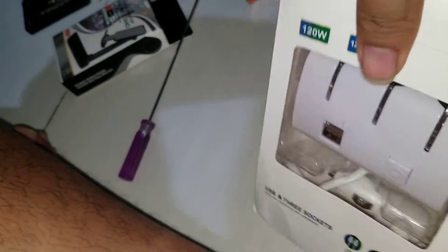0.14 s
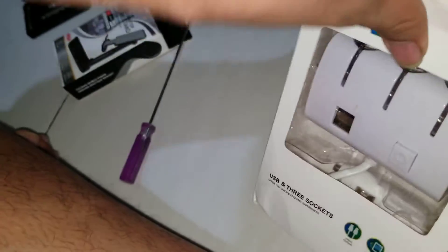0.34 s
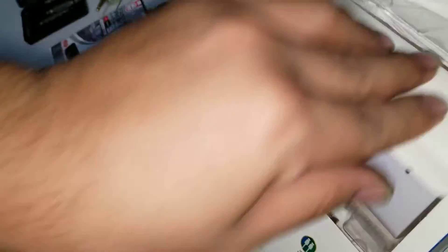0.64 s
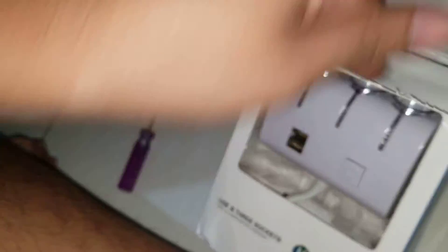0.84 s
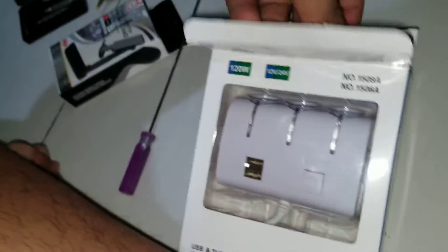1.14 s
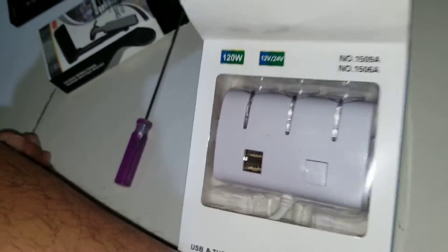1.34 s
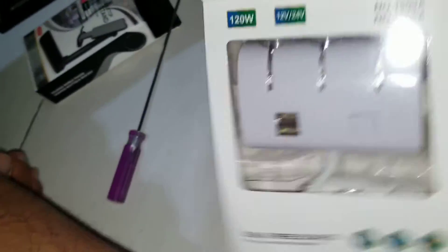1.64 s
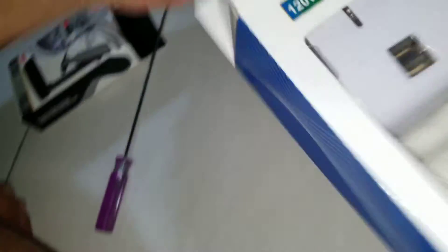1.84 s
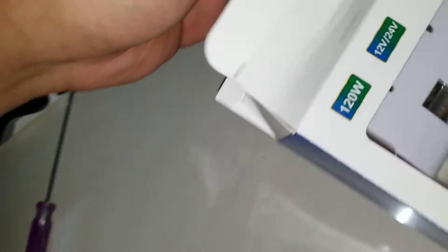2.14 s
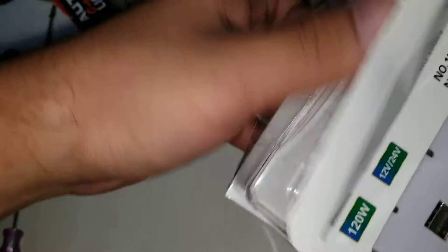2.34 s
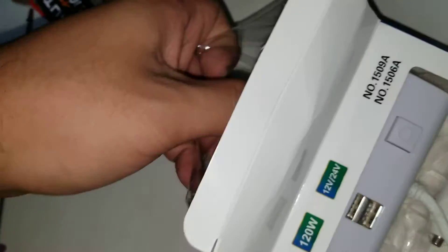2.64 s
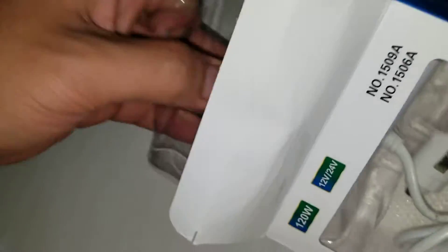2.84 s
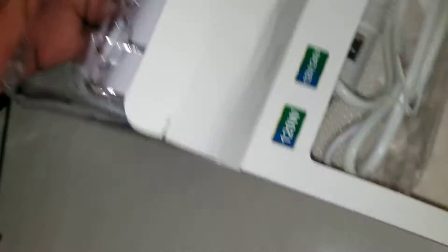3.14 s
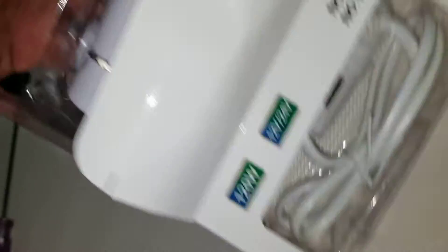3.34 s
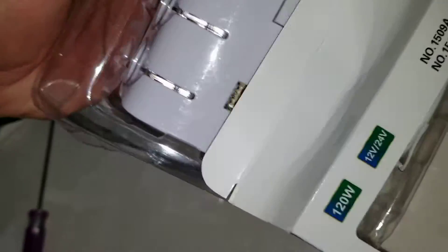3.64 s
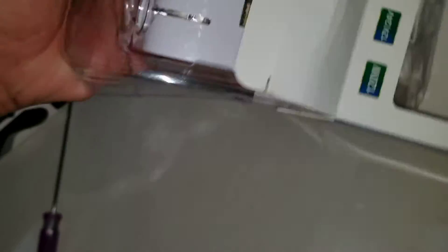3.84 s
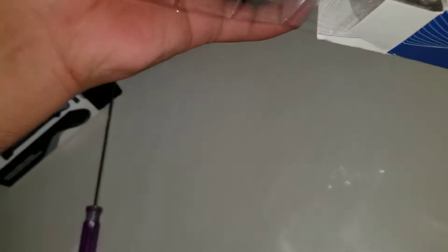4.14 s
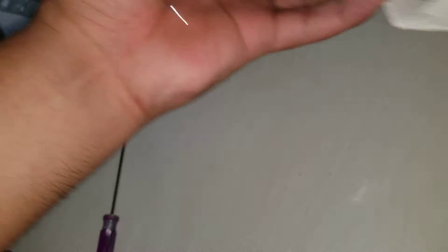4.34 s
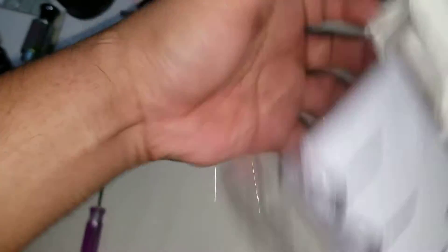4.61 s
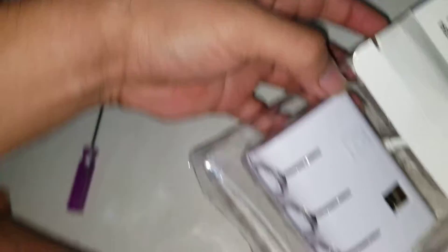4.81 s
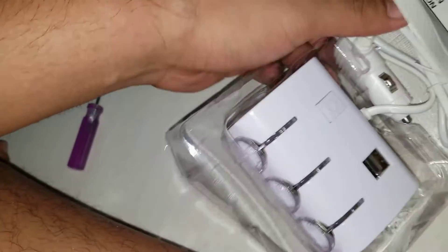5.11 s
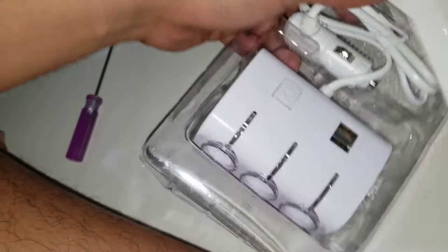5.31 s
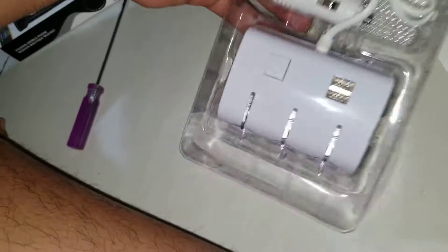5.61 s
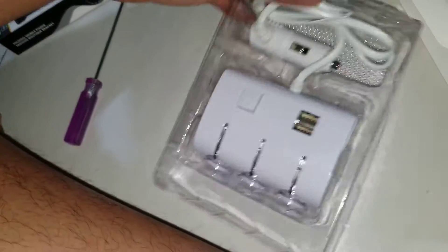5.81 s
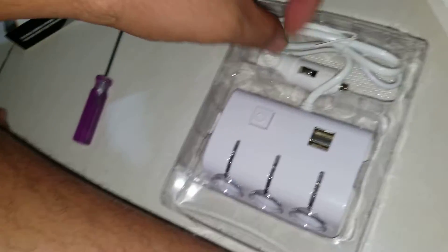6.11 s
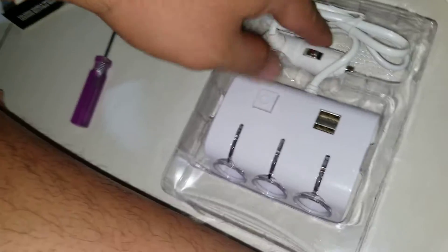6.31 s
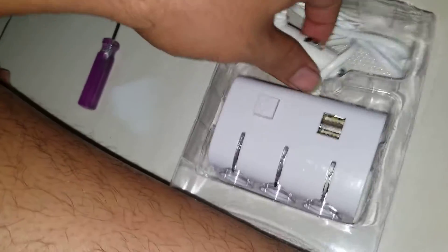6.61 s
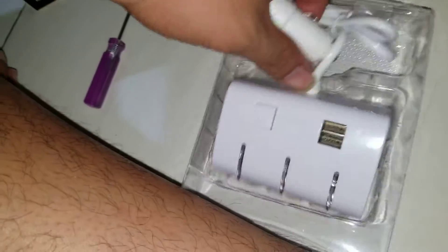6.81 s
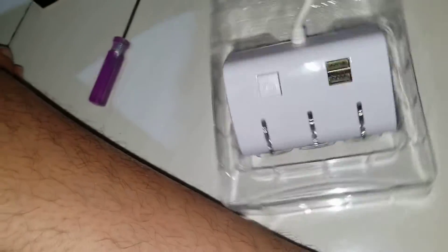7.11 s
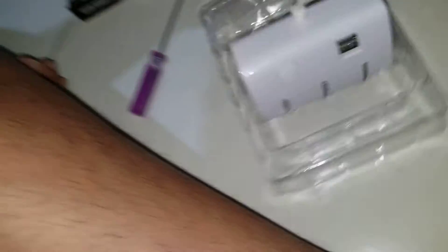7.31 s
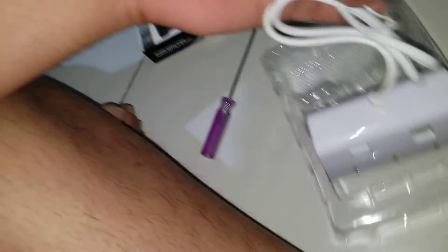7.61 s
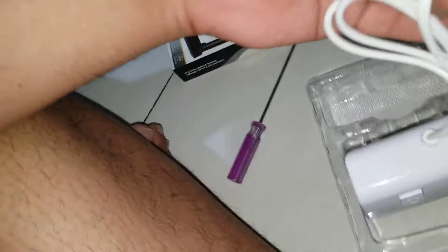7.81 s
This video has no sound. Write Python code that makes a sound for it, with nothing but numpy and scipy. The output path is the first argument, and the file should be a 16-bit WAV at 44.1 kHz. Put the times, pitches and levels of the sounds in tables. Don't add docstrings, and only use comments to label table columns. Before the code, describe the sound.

Close, uneven crackling, sharp plastic snaps and hollow box taps come in bursts with quiet gaps, ending in a softer rustling drag.

```python
import sys
import numpy as np
from scipy import signal
from scipy.fft import rfft, irfft, next_fast_len
from scipy.io import wavfile
from scipy.ndimage import uniform_filter1d

SR = 44100
rng = np.random.default_rng(int(sys.argv[2]) if len(sys.argv) > 2 else 0)


def dump_mix(stems):
    frames = np.atleast_2d(stems).T
    limited = np.clip(frames, -1, 1)
    pcm = np.round(limited * 32767).astype(np.int16)
    wavfile.write(sys.argv[1], SR, pcm)


def to_linear_factor(level_db):
    exponent = np.asarray(level_db, float) / 20
    return 10 ** exponent


N = 350595
SIZE = 4096
BINS = np.arange(SIZE // 2 + 1) * SR / SIZE
PORTS = np.array([[1], [-1]])


def colour(table, hz):
    f, db = np.transpose(table)
    return to_linear_factor(np.interp(np.log(hz + 1), np.log(f), db, left=-60))


def modes(table, hz, sway):
    total = 0
    for (f, width, db), gain in zip(table, sway):
        damping = 1j * hz * width
        total = total + gain * to_linear_factor(db) * damping / (f * f - hz * hz + damping)
    return total


def ring(x, response):
    return irfft(rfft(x, SIZE) * response, SIZE)


def unit(x):
    return x / np.sqrt(np.mean(x ** 2))


def curve(table):
    seconds, values = np.transpose(table)
    return np.interp(np.arange(N) / SR, seconds, values)


def shape(x, response):
    size = next_fast_len(N + SR)
    hz = np.arange(size // 2 + 1) * SR / size
    return irfft(rfft(x, size) * response(hz), size)[..., :N]


# pitch in Hz, width in Hz, level in dB.
SHEET_MODES = [(816.5, 198, 7), (1350, 384, 3.5), (1780, 1020, 2), (2220, 920, 3.5), (3226, 1420, 3.5),
               (4350, 1250, -52)]


def sheet_piece(count, width=.14, spread_db=3):
    pitches = 720 * 7.5 ** rng.random(count)
    levels = spread_db * rng.standard_normal(count) - 1.5
    own = [(p, width * p, db) for p, db in zip(pitches, levels)]
    table = sorted(SHEET_MODES + own)
    signs = (-1.) ** np.arange(len(table))
    return modes(table, BINS, signs) / (1 + 1j * BINS / 5500) ** 2


# pitch in Hz, width in Hz, level in dB.
BOX_MODES = [(202, 28, -4), (291.5, 78, 6.5), (357, 44, -4), (456, 69, 1), (563, 17, -2)]
# frequency in Hz, level in dB.
CRACK_TONE = [(1200, -9.5), (2500, -0.5), (4000, 6.5), (5500, 1.5), (6800, -4), (8500, -8), (11500, -3.5),
              (13500, -9.5), (15500, -0.5)]


def creases(table, rise_share, first=0, edge=2, pitch_db=10, pitch_width=.14, focus_db=7, after_ms=15):
    out = np.zeros((2, N + 2 * SIZE))
    lead = 800
    t = (np.arange(SIZE) - lead) * 1000 / SR
    port_differs = .6 * np.clip(BINS / 3000, .4, 1)
    for s, peak_db, pitch_hz, box_db, crack_db, ms, after_db in table:
        creak = to_linear_factor(-19.5) * np.exp(t / 1.5)
        settling = to_linear_factor(after_db) * np.exp(-t / after_ms)
        around = np.where(t < 0, creak, settling)
        buckle = np.exp(-np.abs(t / np.where(t < 0, rise_share * ms + 0.05, ms)) ** edge)
        mid, side = rng.standard_normal((2, SIZE)) * to_linear_factor(4 * rng.standard_normal(SIZE))
        jolts = mid + PORTS * ring(side, port_differs)

        focus = to_linear_factor(-focus_db * np.abs(np.log2((BINS + 1) / pitch_hz)))
        own = modes([(pitch_hz, pitch_width * pitch_hz, pitch_db)], BINS, [1])
        own = own / (1 + 1j * BINS / (2 * pitch_hz))
        sheet = ring(buckle * jolts + first * (t == 0), focus * sheet_piece(count=6) + own)
        sheet = sheet + ring(around * jolts, sheet_piece(count=6))

        push = np.sin(np.pi * np.clip(t / 0.57, 0, 1)) + .5 * (buckle + around) * mid
        sway = 1 + .4 * rng.standard_normal(len(BOX_MODES))
        box = ring(push, modes(BOX_MODES, BINS, sway) * BINS / (BINS + 300))
        crack = ring((buckle + around) * jolts, colour(CRACK_TONE, BINS))

        i = int(s * SR) + SIZE - lead
        for part, db in [(sheet, 0), (box, box_db + 4.0), (crack, crack_db + 8.5)]:
            out[:, i:i + SIZE] += to_linear_factor(peak_db + db) * part / np.abs(part).max()
    return out[:, SIZE:N + SIZE]


def snaps(table, box_db, after_db):
    buckle_ms = 2.52
    rows = [(s, db, hz, box_db, crack, buckle_ms, after_db) for s, db, hz, crack in table]
    return creases(rows, rise_share=0.27, first=7.3, edge=1.56, pitch_db=8.5, pitch_width=0.1,
                   after_ms=11.35)


def sings(table, width, apart, rough=.8):
    out = np.zeros((2, N + SIZE))
    t = np.arange(SIZE) * 1000 / SR
    for s, peak_db, pitch_hz, ms in table:
        beat = np.sin(2 * np.pi * (pitch_hz * t / 1000 + rng.random((2, 1))))
        noise = rng.standard_normal((2, SIZE)) / np.sqrt(width * pitch_hz / SR * 4)
        drive = beat + rough * max(pitch_hz / 1400, 1) ** 2 * noise
        mid, side = drive * np.clip(t / 0.51, 0, 1) * np.exp(-(t / ms) ** 3)
        resonance = modes([(pitch_hz, width * pitch_hz, 0)], BINS, [1]) ** 2
        tone = ring(mid + apart * side * PORTS, resonance)
        i = int(s * SR)
        out[:, i:i + SIZE] += to_linear_factor(peak_db) * tone / np.abs(tone).max()
    return out[:, :N]


# time in seconds, unevenness from 0 to 1.
UNEVENNESS = [
    (0, .8),
    (7.03, .8),
    (7.1, .3),
    (7.95, .3),
]


def fits(hold, spread_db):
    steps = np.repeat(rng.standard_normal(N // hold + 1), hold)[:N]
    return to_linear_factor(spread_db * curve(UNEVENNESS) * uniform_filter1d(steps, hold // 3))


def grains(rate, scatter_db):
    strength = np.minimum(rng.exponential(size=N), 4)
    size = to_linear_factor(scatter_db * curve(UNEVENNESS) * strength) * rng.standard_normal(N)
    return size * (rng.random(N) < rate / SR)


# time in seconds, rustle level in dB.
EFFORT_POINTS = [(0.0, -42.5), (0.68, -60.5), (1.0, -47), (1.25, -47.5), (1.75, -39.5), (2.08, -61),
                 (2.3, -55), (2.74, -61), (3.14, -46), (4.1, -56), (4.9, -47), (5.12, -45), (5.4, -58.5),
                 (5.96, -80), (6.42, -55), (6.84, -59), (7.2, -44.5), (7.95, -45.5)]
# time in seconds, rustle level in dB, half length in seconds.
PULL_EVENTS = [
    (0.876, -43, 0.062),
    (1.48, -21.5, 0.071),
    (2.522, -45.5, 0.038),
    (2.93, -48, 0.1),
    (3.845, -51, 0.047),
    (4.617, -37.5, 0.12),
    (5.166, -28, 0.053),
    (5.61, -62, 0.47),
    (6.535, -35, 0.052),
]


def effort_db():
    t = np.arange(N) / SR
    pulls = sum(to_linear_factor(db) * np.exp(-((t - s) / half) ** 2) for s, db, half in PULL_EVENTS)
    return 20 * np.log10(to_linear_factor(curve(EFFORT_POINTS)) + pulls)


# pitch in Hz, width in Hz, level in dB.
DRAG_MODES = [(290, 67, 7), (440, 67, 1.5), (790, 180, -16)]


def rustle(apart=.6):
    effort = fits(hold=900, spread_db=3.5)
    sheet, shake = 0, 0
    for _ in range(6):
        patch = effort * fits(hold=400, spread_db=4)
        mid = patch * grains(1500, 0.78)
        side = patch * grains(1500, 5.2)
        echo = irfft(sheet_piece(count=8))[None]
        sheet = sheet + signal.oaconvolve(mid + apart * PORTS * side, echo, axes=1)[:, :N]
        shake = shake + mid

    box = shape(shake, lambda hz: modes(DRAG_MODES, hz, np.ones(len(DRAG_MODES))) * hz / (hz + 200))
    box = unit(box) * to_linear_factor(3 * (UNEVENNESS[0][1] - curve(UNEVENNESS)))

    rub = effort * fits(hold=300, spread_db=-6.0) * rng.standard_normal((2, N))
    rub = rub[0] + .7 * PORTS * rub[1]
    hiss = shape(.8 * unit(shake) + rub, lambda hz: colour(CRACK_TONE, hz))

    work = effort_db() + 52
    return (to_linear_factor(-52.5 + 0.62 * work) * unit(sheet)
            + to_linear_factor(-53 + 0.43 * work) * unit(box)
            + to_linear_factor(-59.5 + 0.65 * work) * unit(hiss))


# time in seconds, rumble level in dB.
GRIP_POINTS = [
    (0.0, -47),
    (0.11, -61),
    (2.86, -65),
    (3.03, -55.5),
    (4.25, -64),
    (5.0, -43.5),
    (5.6, -64.5),
    (6.22, -68),
    (6.67, -57),
]


def grip():
    case = [(58.3, 220, -6.5), (132, 320, -2.5)]  # Hz, width Hz, dB
    shaking = fits(hold=2000, spread_db=2) * rng.standard_normal(N)
    rumble = shape(shaking, lambda hz: modes(case, hz, [1, -1]) * hz ** 2 / (hz ** 2 + 40 ** 2))
    return to_linear_factor(curve(GRIP_POINTS) + np.array([[-3.], [2.5]])) * unit(rumble)


# frequency in Hz, level in dB per Hz.
FAN_TONE = [(88, -58), (150, -20), (286, 10.5), (328, -14), (361, -6), (383, -13), (566, -13.5), (624, -59),
            (759, -7), (1500, -8), (3100, -19), (4000, -47), (16000, -13.5)]


def fan():
    mid = shape(rng.standard_normal(N), lambda hz: colour(FAN_TONE, hz))
    side = shape(rng.standard_normal(N), lambda hz: colour(FAN_TONE, hz) * np.clip(hz / 1300, .15, 1))
    return to_linear_factor(-58) * unit(mid + side * PORTS) * to_linear_factor(np.array([[-2.], [2.]]))


# time in seconds, peak in dB, sheet pitch in Hz, crack in dB against the peak.
TAP_EVENTS = [(0.014, -8.5, 1280, -10.5), (0.939, -22.5, 780, -11), (1.101, -31, 820, -5),
              (1.196, -21.5, 935, -5), (1.949, -33, 1320, -30), (2.23, -41, 1400, -22),
              (2.45, -24.5, 840, -6.5), (3.347, -16.5, 910, -16), (3.372, -19.5, 3200, -11.5),
              (3.691, -21.5, 830, -9.5), (3.745, -27.5, 1390, -25), (3.885, -20.5, 2870, -2),
              (4.459, -23, 1090, -7.5), (4.563, -28, 895, -7), (4.714, -23, 1030, -14),
              (4.747, -48, 690, -21), (5.139, -18.5, 2720, -32), (5.34, -22, 900, -2),
              (5.799, -15, 3330, -1.5), (5.874, -11.5, 1300, -8), (6.154, -30.5, 1010, -19),
              (6.529, -15, 3060, -15), (6.615, -24.5, 2880, -26), (6.87, -15, 2980, -7.5)]


def taps():
    return snaps(TAP_EVENTS, box_db=-11, after_db=-10)


# time in seconds, peak in dB, pitch in Hz, length in ms.
BOOM_EVENTS = [(0.014, -21.5, 290, 5.3), (0.042, -39.5, 310, 14), (0.1, -42, 306, 12),
               (0.875, -29.5, 426, 5), (0.952, -25, 395, 8.7), (0.995, -31.5, 400, 9.4),
               (1.02, -32, 426, 6), (1.518, -28, 425, 22), (1.662, -32, 375, 11), (1.714, -31.5, 306, 16),
               (2.058, -40, 323, 15), (3.367, -30.5, 290, 4.7), (4.663, -27, 375, 31),
               (4.978, -29, 305, 15), (5.152, -31, 303, 7.4), (5.178, -30, 337, 8.3),
               (5.325, -29.5, 349, 9.8), (5.346, -25, 476, 3.8), (5.4, -26.5, 440, 11.4),
               (5.8, -30.5, 407, 22), (6.478, -29, 475, 10), (6.503, -30, 458, 5.6),
               (6.528, -24, 417, 10.5), (6.75, -30, 376, 12), (6.87, -27.5, 378, 12), (7.0, -37.5, 445, 64),
               (7.155, -38, 435, 37), (7.18, -36, 323, 9.2), (7.51, -46, 290, 19), (7.6, -41.5, 290, 26),
               (7.75, -40, 458, 28), (7.82, -42, 290, 47)]


def booms():
    return sings(BOOM_EVENTS, width=0.3, apart=0.2)


# time in seconds, peak in dB, pitch in Hz, length in ms.
PING_EVENTS = [(0.015, -29, 1350, 10), (0.038, -18, 3050, 6.3), (0.197, -41, 1760, 8.9),
               (0.858, -35, 4820, 8), (0.892, -28, 2900, 16), (0.895, -26, 4000, 11),
               (1.381, -17.5, 1740, 10), (1.404, -30, 1277, 9.6), (1.508, -19, 1540, 6),
               (1.527, -25, 1064, 5), (1.556, -24, 2350, 4.5), (1.566, -31, 1490, 15),
               (1.668, -23, 1410, 4.7), (1.677, -11, 1350, 3.2), (1.696, -7, 2040, 4.9),
               (1.76, -25, 1370, 8.5), (1.722, -32, 2500, 20), (2.082, -42, 1270, 4.2),
               (2.257, -19, 3300, 4), (2.27, -34, 842, 42), (2.46, -41, 866, 9.1), (2.738, -33, 790, 3.4),
               (2.934, -30, 2110, 6.7), (2.985, -36, 1750, 13), (3.088, -34, 756, 5), (3.11, -39, 720, 3.6),
               (3.247, -35, 2210, 12), (3.36, -27, 2220, 8), (3.372, -15, 3000, 3.6),
               (3.372, -19.5, 4700, 2.8), (4.64, -31, 1350, 10), (4.91, -21, 2940, 5),
               (5.152, -23, 3020, 16), (5.17, -6.5, 5400, 2.5), (5.202, -28, 2590, 6.6),
               (5.339, -19, 900, 4.1), (5.408, -30, 1080, 8), (5.733, -27, 1367, 5.4),
               (5.824, -30, 1345, 26), (6.165, -42, 930, 7.1), (6.503, -18.5, 5430, 4.8),
               (6.583, -26, 1540, 4.6), (6.706, -21.5, 2100, 6.5), (6.755, -26, 4030, 5),
               (6.81, -29, 2850, 8.8), (1.654, -25, 1350, 13), (1.712, -16, 1400, 3.9),
               (1.7505, -9, 1420, 2.6), (7.0, -30.5, 899, 22), (4.995, -8, 5880, 2.7)]


def pings():
    return sings(PING_EVENTS, width=0.2, apart=0.5)


# time in seconds, peak in dB, sheet pitch in Hz, crack in dB against the peak.
TICK_EVENTS = [(0.996, -33, 3500, -14), (1.019, -28, 4000, -10), (1.395, -16, 3000, -7),
               (1.429, -29, 4800, -6), (1.454, -22, 2800, -5), (1.609, -38, 1700, -19),
               (1.9, -48, 900, -12), (2.007, -51, 5000, -6), (2.254, -33, 3000, -5), (2.272, -21, 4200, -5),
               (2.675, -36, 1600, -14), (2.75, -27, 1500, -11), (3.331, -19, 3000, -12),
               (4.664, -18, 2400, 8), (4.674, -17, 2800, -8), (4.737, -20, 3500, -14),
               (4.903, -22.5, 2800, -13), (5.011, -24, 5000, -12), (5.282, -35, 900, -17),
               (5.346, -13.5, 3000, 0.5), (6.563, -35, 3200, 4), (6.569, -32, 2800, 3),
               (6.596, -26, 2900, -5), (6.7, -25, 2000, -16), (6.718, -14, 3500, -14),
               (6.747, -19.5, 850, -12), (4.9765, -2, 3100, -18), (0.848, -39, 3200, 1),
               (0.883, -25, 2200, -7), (0.903, -33, 4000, -2), (0.909, -38, 2700, -6),
               (0.92, -38, 3000, -3), (0.983, -13.5, 1470, -15), (0.056, -21, 3550, -8),
               (0.017, -15, 2900, -8.5), (5.187, -27, 5000, -6), (5.205, -26, 4500, -9),
               (3.729, -34, 4000, -6), (2.008, -41, 8900, 3)]


def ticks():
    box_db, buckle_ms, after_db = -18, 1.8, -28.5
    rows = [(s, db, hz, box_db, crack, buckle_ms, after_db) for s, db, hz, crack in TICK_EVENTS]
    return creases(rows, rise_share=0.19, first=14, edge=0.92)


# time in seconds, peak in dB, sheet pitch in Hz, crack in dB against the peak.
FLEX_EVENTS = [(0.04, -13, 860, -16.5), (0.166, -32.5, 1270, -24), (0.266, -28.5, 1860, -20),
               (0.973, -15.5, 910, -33), (1.063, -29.5, 851, -1), (1.17, -31, 595, -25),
               (1.389, -13, 1780, -22), (1.538, -13.5, 2970, -7), (2.259, -15, 860, -14),
               (2.496, -27.5, 1030, -12), (3.034, -20, 660, -5), (3.099, -27, 666, -2.5),
               (3.521, -23.5, 2600, -38), (3.983, -29.5, 706, -6), (4.91, -17.5, 2760, -29),
               (4.977, -14, 810, -25), (5.119, -23, 790, -25), (5.398, -17.5, 1236, -28),
               (5.593, -22.5, 990, -30), (6.479, -20, 1340, -19), (6.584, -25.5, 1520, -13),
               (6.688, -34, 1350, 2), (6.706, -17, 915, -18), (6.755, -20, 1270, -18),
               (6.809, -23, 2840, -24), (6.996, -21, 990, -38), (7.426, -40.5, 818, 6.5),
               (7.575, -29.5, 1350, -6.5), (7.749, -23.5, 1360, -8.5)]


def flexes():
    return snaps(FLEX_EVENTS, box_db=-9, after_db=-8)


# time in seconds, peak in dB, pitch in Hz, crack in dB, half length in ms.
SCRAPE_EVENTS = [(0.069, -30.5, 755, -11, 21), (0.382, -13, 1390, -11.5, 8.9), (0.692, -37, 3960, 3, 22),
                 (0.893, -29.5, 2780, -6, 39), (0.956, -35, 860, 1, 9.4), (0.967, -15, 770, -22, 3.1),
                 (1.003, -23, 960, -10, 8.4), (1.382, -22, 1780, -30, 5.4), (1.42, -18.5, 825, -8, 7.8),
                 (0.861, -26.5, 2920, -9.5, 7), (1.767, -24, 12300, -8, 53), (3.052, -25.5, 12000, -4, 14),
                 (2.724, -29, 780, -11, 28), (3.762, -38, 700, 2.5, 17), (3.793, -39, 3660, 7, 3.8),
                 (3.814, -42, 624, 3.5, 13), (4.354, -34, 1110, -1.5, 28), (4.662, -20, 2270, -27, 27),
                 (4.691, -43, 790, -26.5, 11), (4.916, -29, 2930, -5.5, 59), (5.211, -29.5, 805, -19, 7.4),
                 (5.557, -42, 1000, -19, 9.7), (6.55, -50, 842, -16, 8.9), (6.951, -35, 770, -3, 25),
                 (7.149, -36, 750, -2.5, 27)]


def scrapes():
    rows = [(s, db, hz, -15.5 - 0.25 * db, crack, ms, -32) for s, db, hz, crack, ms in SCRAPE_EVENTS]
    return creases(rows, rise_share=0.48, pitch_db=8.5, focus_db=0.5)


# time in seconds, peak in dB, sheet pitch in Hz, crack in dB against the peak.
CLICK_EVENTS = [(0.181, -27.5, 1360, -38), (0.313, -12.5, 2990, -7.5), (0.874, -25, 780, -1),
                (1.127, -34.5, 1500, -4), (1.459, -27, 890, 3.5), (1.5025, -13, 1740, 0.5),
                (1.547, -13, 1780, -10), (1.677, -2.5, 2450, -12), (1.6955, -3.5, 2460, -27),
                (1.7515, -14, 1490, 3), (2.05, -8.5, 1390, -16), (2.637, -32, 820, -27),
                (3.219, -6, 2260, 1.5), (3.725, -36, 2450, -7), (3.948, -23, 1450, -12),
                (4.113, -33, 1060, -40), (4.43, -32, 3000, -15), (4.748, -17.5, 3050, -26),
                (4.946, -24, 2430, -15), (4.9955, -11.5, 3050, -3.5), (5.171, -11.5, 2440, -1.5),
                (5.323, -30, 1310, -31), (5.389, -18, 990, -35), (5.734, -28, 3000, -1),
                (6.363, -23, 2230, -28), (6.384, -17, 2770, -35), (6.504, -13.5, 2910, -17),
                (6.777, -17.5, 1410, 3), (6.899, -23, 1350, -6)]


def clicks():
    return snaps(CLICK_EVENTS, box_db=-20.5, after_db=-13.5)


# time in seconds, peak in dB, sheet pitch in Hz, crack in dB against the peak.
CRINKLE_EVENTS = [(0.29, -24, 1310, -12), (0.368, -16.5, 1350, 2), (1.67, -27, 2400, 7.5),
                  (2.347, -33.5, 774, 0), (2.431, -33.5, 2820, -9), (2.697, -23, 2130, -9),
                  (2.717, -23, 650, -23), (2.855, -34.5, 2190, 3), (2.903, -14, 4500, -23),
                  (2.905, -15, 1520, -3.5), (2.973, -24.5, 820, 0), (3.02, -18, 770, -19),
                  (3.328, -24, 780, -34), (3.946, -33, 4800, -50), (4.658, -14.5, 1390, 1.5),
                  (5.827, -18, 2830, -7), (6.408, -13.5, 2900, -10), (6.727, -16, 2920, -3.5)]


def crinkles():
    return snaps(CRINKLE_EVENTS, box_db=-22.5, after_db=-6.5)


# time in seconds, peak in dB, pitch in Hz, length in ms.
HISS_EVENTS = [
    (0.8, -41, 13000, 69),
    (0.87, -41, 13000, 60),
    (0.93, -39, 13000, 50),
    (1.51, -38, 12500, 70),
    (1.755, -22, 14500, 55),
    (5.0, -37, 6200, 55),
    (5.175, -34, 5550, 55),
]


def film_hisses():
    return sings(HISS_EVENTS, width=0.45, apart=0.8)


# time in seconds, peak in dB, pitch in Hz, crack in dB, half length in ms.
SQUEAK_EVENTS = [
    (1.2765, -38, 13500, -1, 13),
    (2.39, -34, 10500, -16, 21),
]
KNOCK_EVENTS = [
    (1.9, -28, 1350, -2, 12),
    (1.712, -20, 1400, -30, 8.8),
    (1.4, -28, 1200, -30, 17),
    (1.968, -22, 1510, -40, 6.4),
    (7.001, -27.5, 915, -21, 33),
]


def squeaks_and_knocks():
    events = KNOCK_EVENTS + SQUEAK_EVENTS
    rows = [(s, db, hz, -14.5, crack, ms, -30) for s, db, hz, crack, ms in events]
    return creases(rows, rise_share=.1, edge=4, pitch_db=16, pitch_width=.06)


# middle in Hz, time to fade by 60 dB in seconds, level in dB.
ROOM_BANDS = [(277, 0.15, -22.5), (990, 0.19, -22.5), (3330, 0.31, -25.5), (10600, 0.29, -15.5)]


def room():
    t = np.arange(SR // 2) / SR
    tail = 0
    for hz, t60, db in ROOM_BANDS:
        band = signal.butter(1, [hz / 2, min(hz * 2, 20000)], "band", fs=SR, output="sos")
        mid, side = signal.sosfilt(band, rng.standard_normal((2, len(t))))
        noise = mid + min(hz / 2500, 1) * side * PORTS
        fade = noise * np.exp(-np.log(1000) * t / t60) * np.clip(t / 0.0024 - .5, 0, 1)
        tail = tail + to_linear_factor(db) * fade / np.sqrt(np.sum(fade ** 2) / 4)
    return tail


# frequency in Hz, lag in radians.
LEFT_LAG = [(0, 0), (1000, 0), (2500, .9), (4500, 3.8), (7000, 6.5), (17000, 17)]
# frequency in Hz, level in dB.
LEFT_TONE = [(100, -.5), (300, .5), (550, -1), (1000, .5), (4000, -1), (8000, 3), (13000, 4)]
# time in seconds, left minus right in dB.
BALANCE = [
    (0.0, -5.5),
    (0.66, -5.5),
    (4.54, -4.0),
    (4.89, -12.0),
    (5.0, -12.5),
    (5.53, -4.5),
    (7.95, -4.5),
]


def two_ports(hands):
    def left_response(hz):
        return colour(LEFT_TONE, hz + 100) * np.exp(-1j * np.interp(hz, *np.transpose(LEFT_LAG)))

    left = shape(hands[0], left_response)
    pan_db = curve(BALANCE)
    return np.array([left * to_linear_factor(pan_db / 2), hands[1] * to_linear_factor(-pan_db / 2)])


def scene():
    hands = flexes() + taps() + crinkles() + clicks()
    hands = hands + scrapes() + squeaks_and_knocks() + rustle()
    tail = room()
    behind = fan() + grip()
    hands = hands + ticks() + pings() + booms() + film_hisses()
    echo = signal.fftconvolve(hands.mean(axis=0, keepdims=True), tail, axes=1)[:, :N]
    return two_ports(hands + echo) + behind


def roll_off(x):
    return signal.sosfilt(signal.butter(12, 17000, fs=SR, output="sos"), x)


# frequency in Hz, level in dB.
TOP_TONE = [(20, 0), (15650, 0), (15900, -42), (16900, -46), (17050, -90)]


def record(dry):
    coloured = shape(np.tanh(dry), lambda hz: colour(TOP_TONE, hz + 20))
    return roll_off(coloured)


dry = scene()
out = record(dry)
dump_mix(out)
```